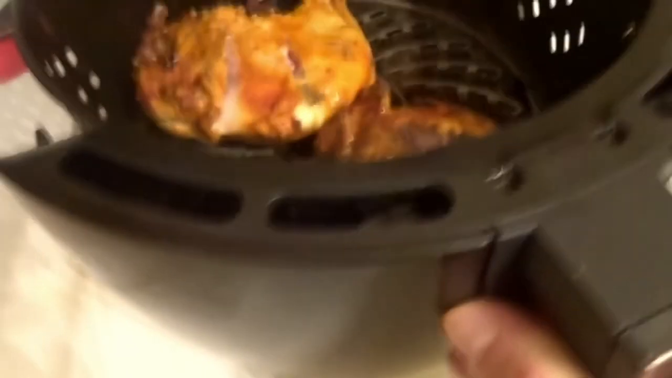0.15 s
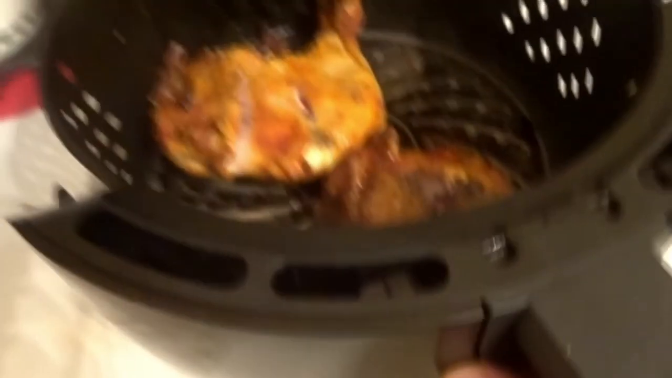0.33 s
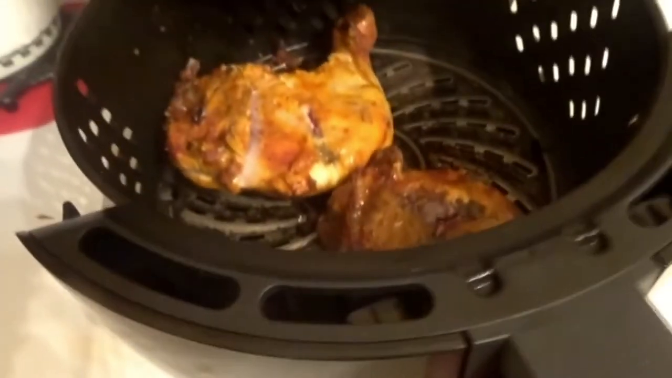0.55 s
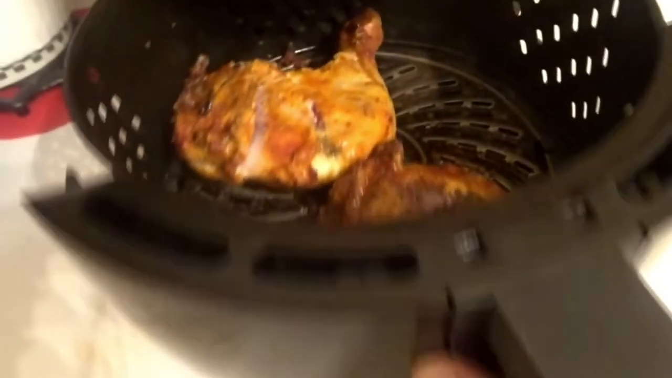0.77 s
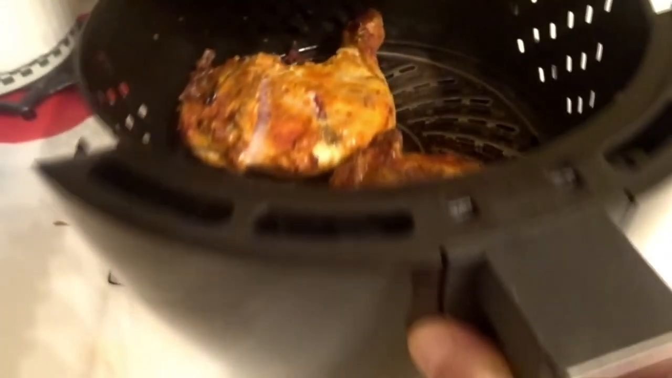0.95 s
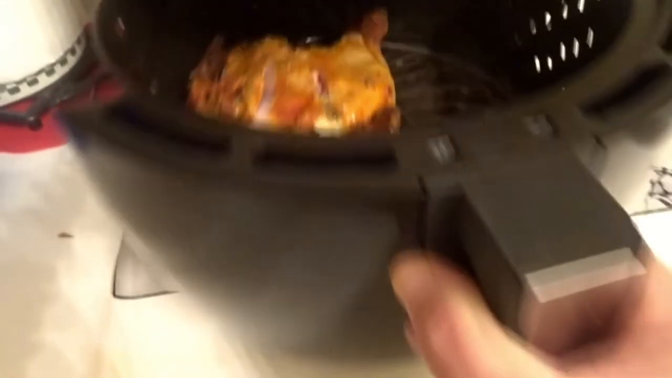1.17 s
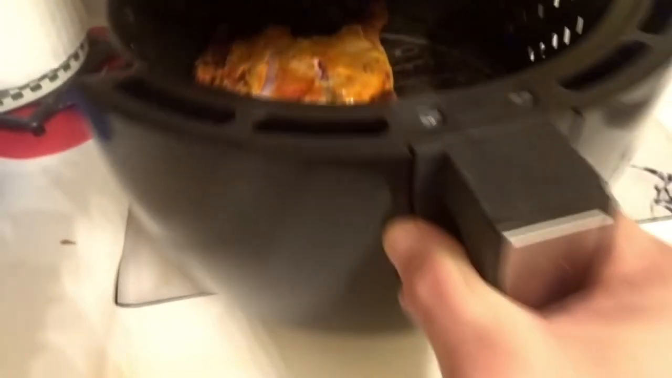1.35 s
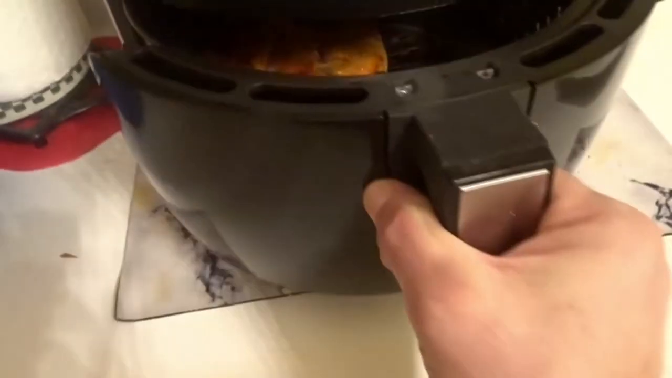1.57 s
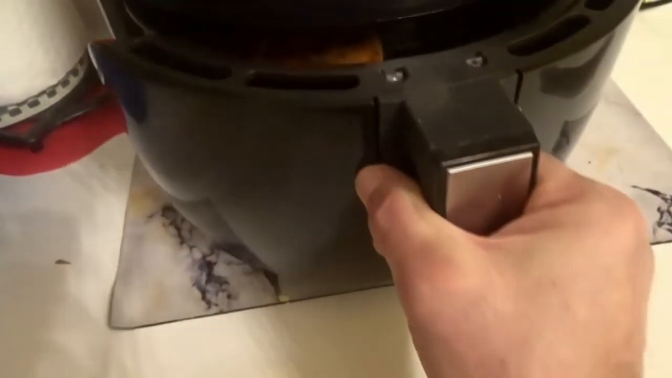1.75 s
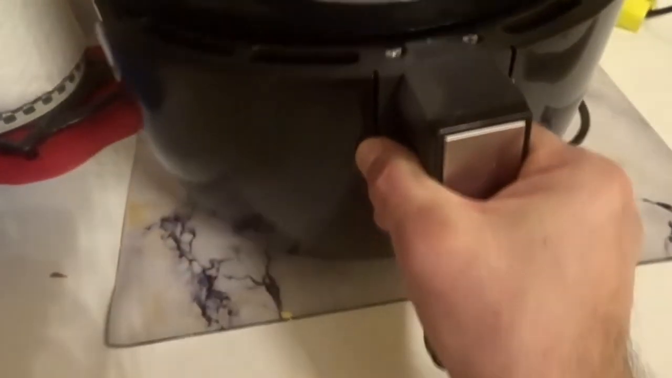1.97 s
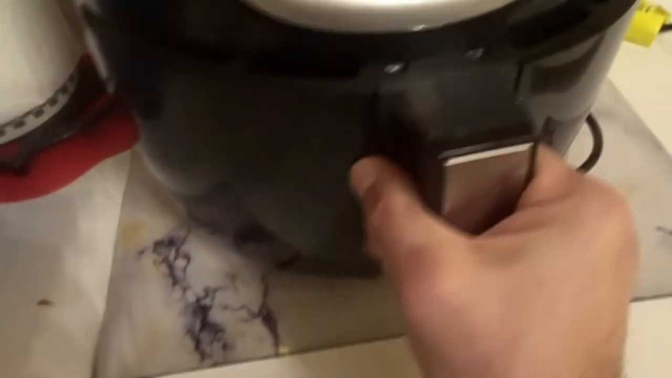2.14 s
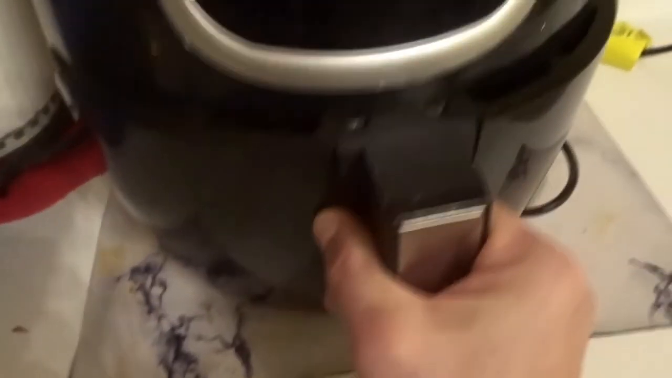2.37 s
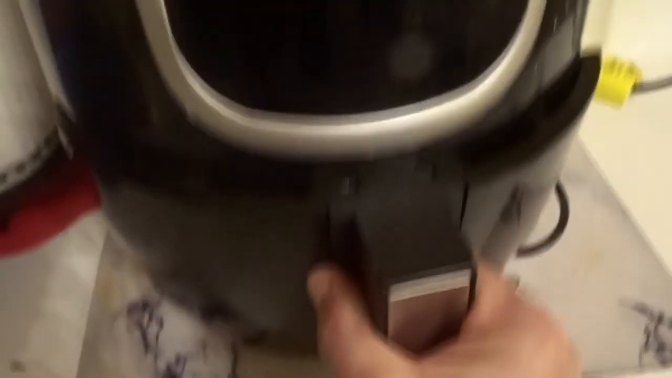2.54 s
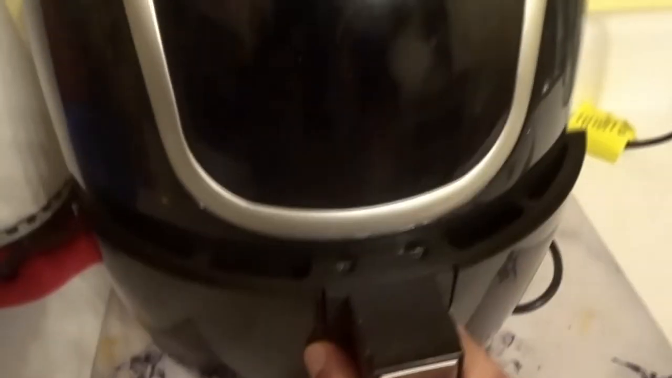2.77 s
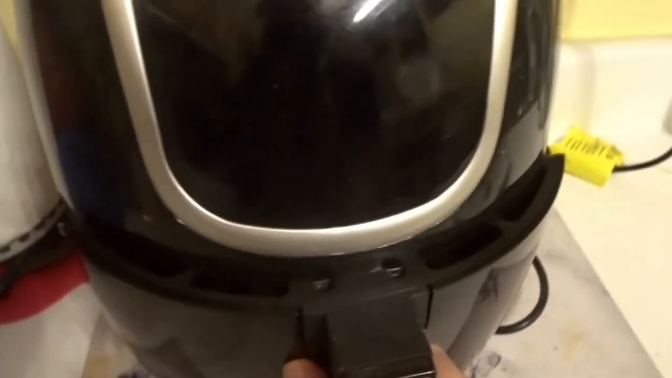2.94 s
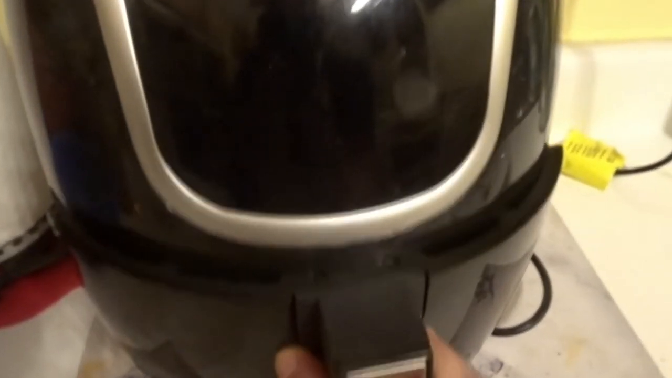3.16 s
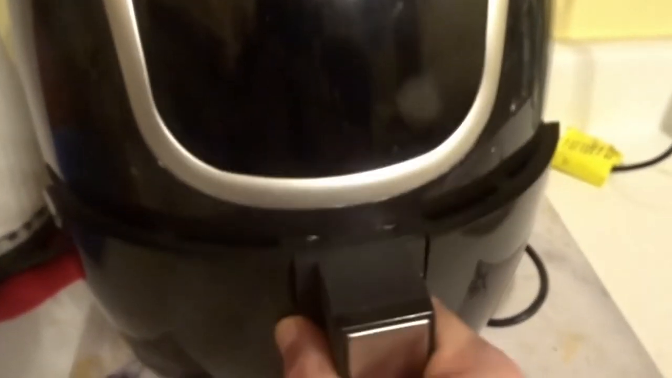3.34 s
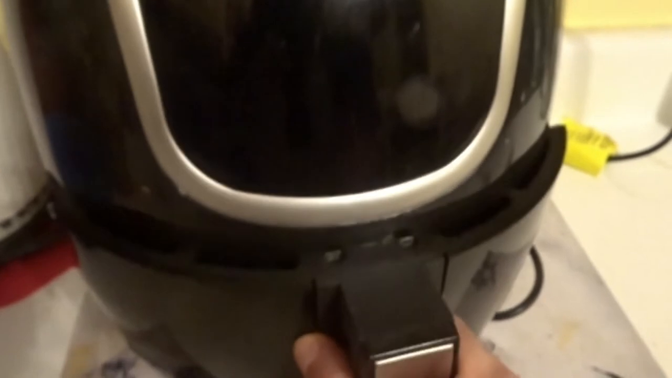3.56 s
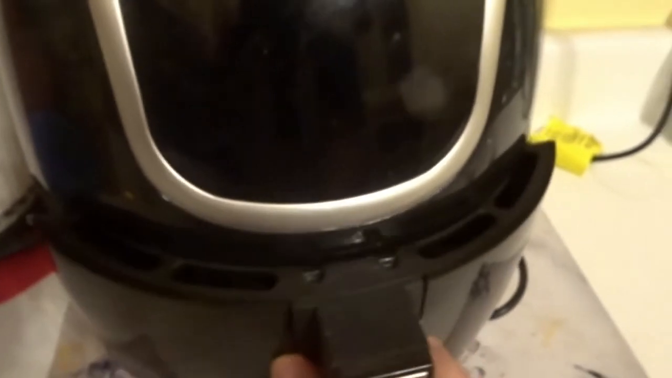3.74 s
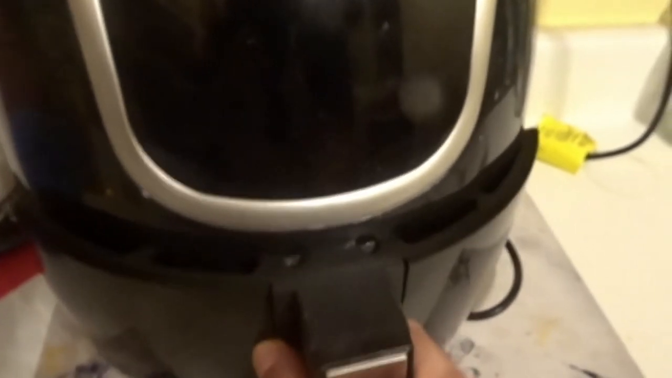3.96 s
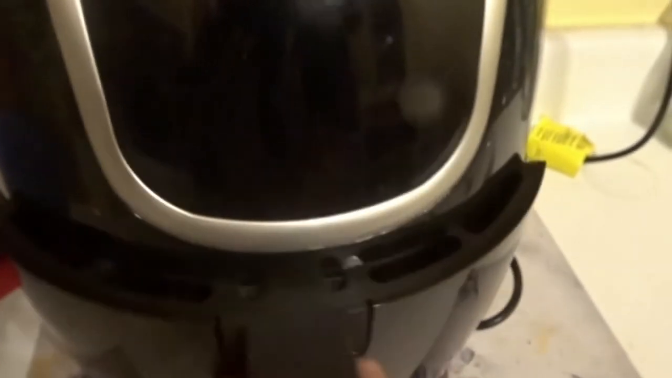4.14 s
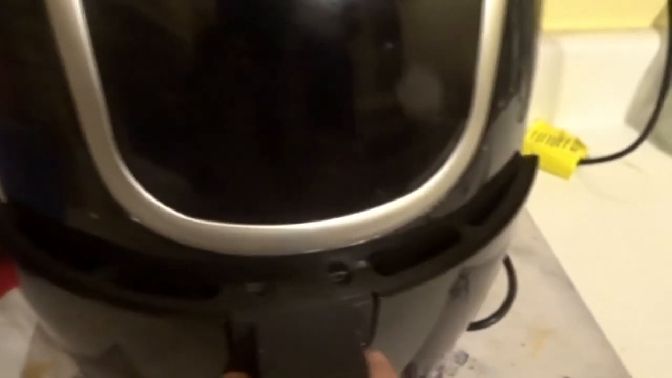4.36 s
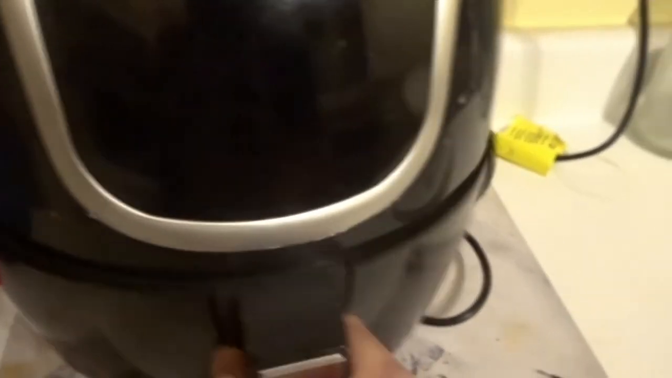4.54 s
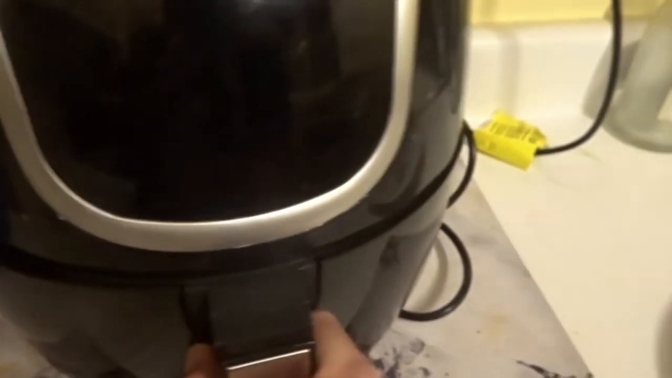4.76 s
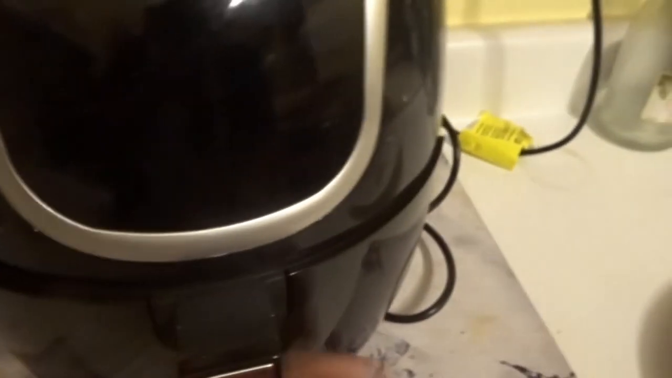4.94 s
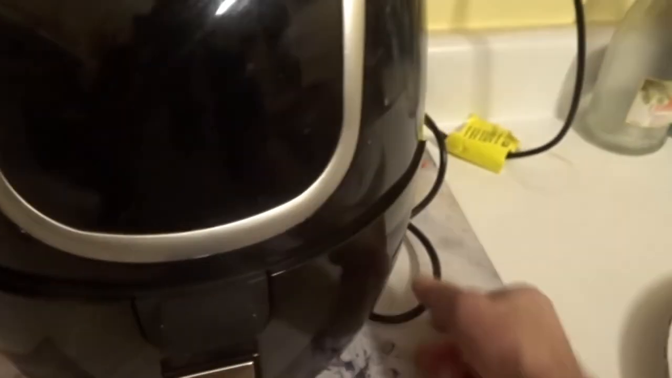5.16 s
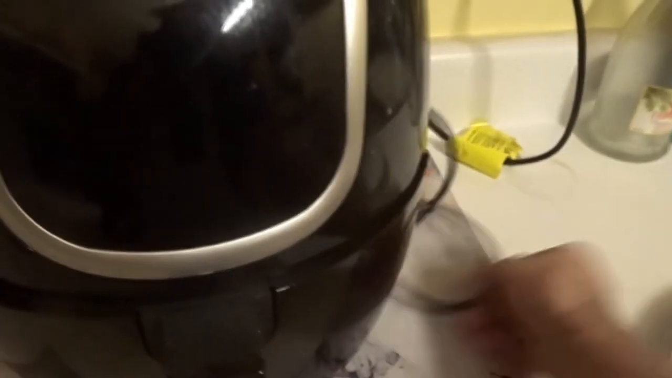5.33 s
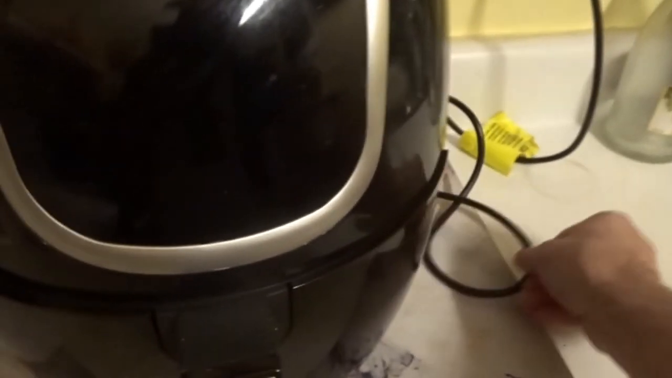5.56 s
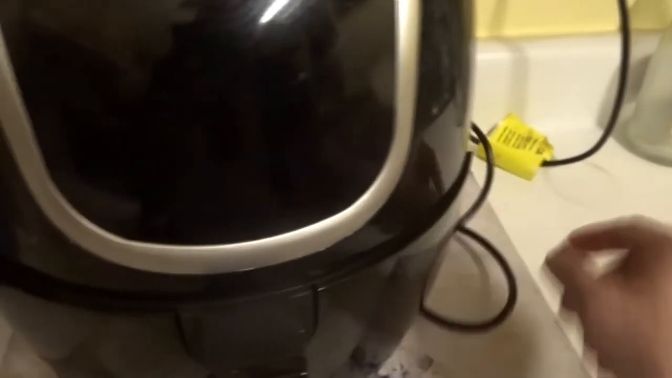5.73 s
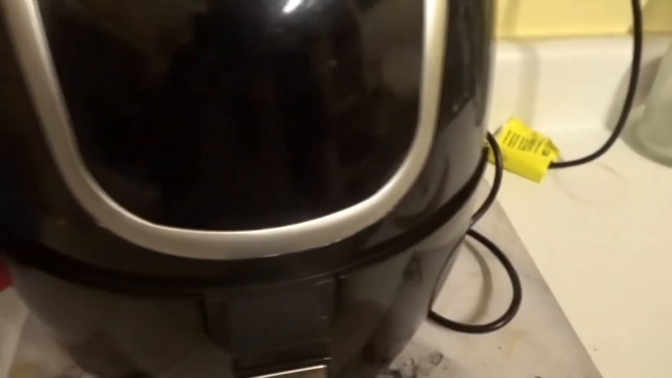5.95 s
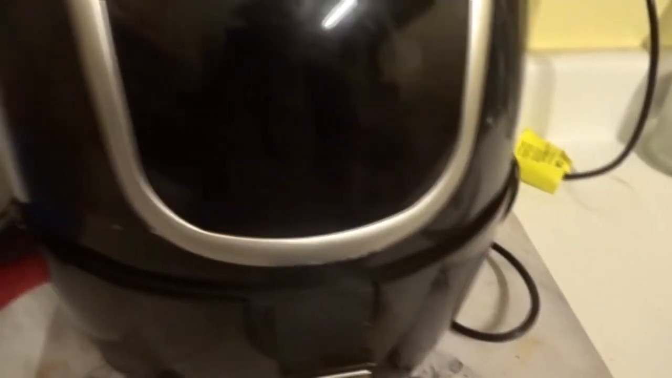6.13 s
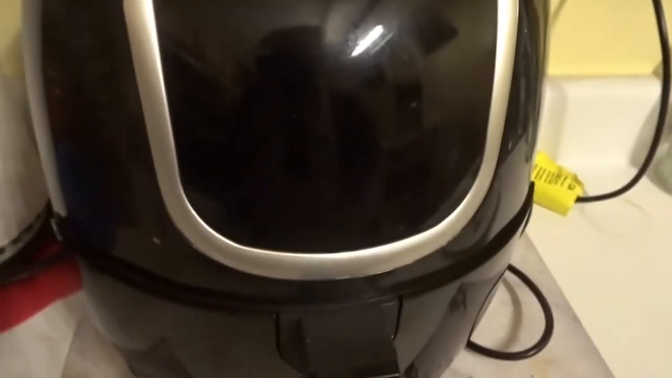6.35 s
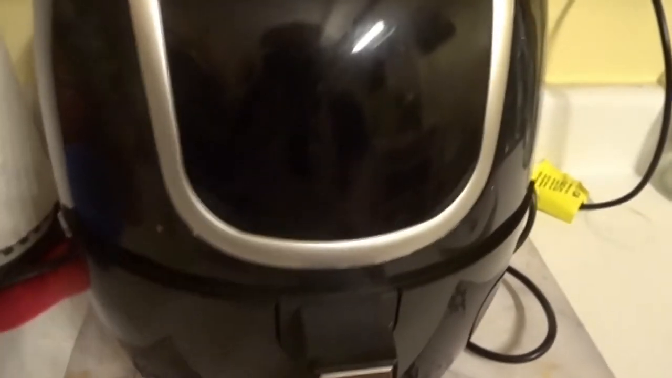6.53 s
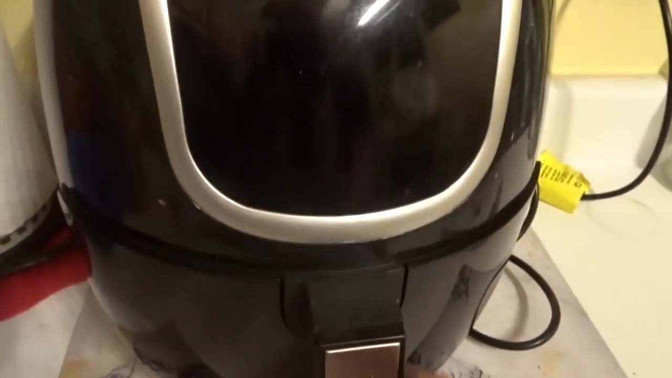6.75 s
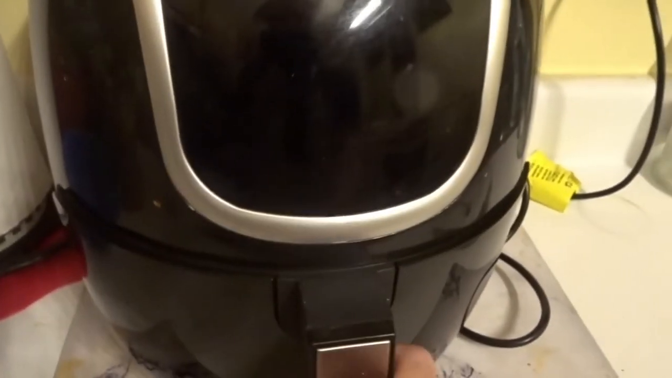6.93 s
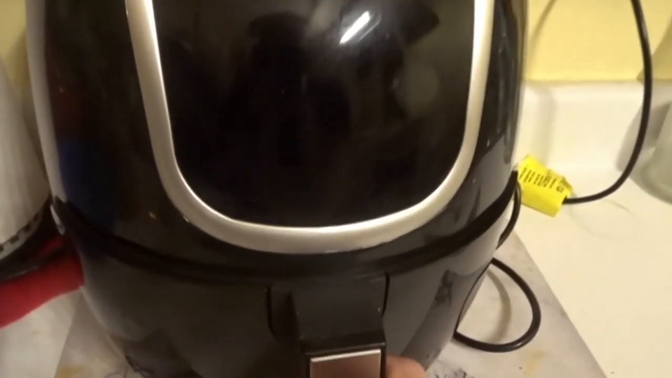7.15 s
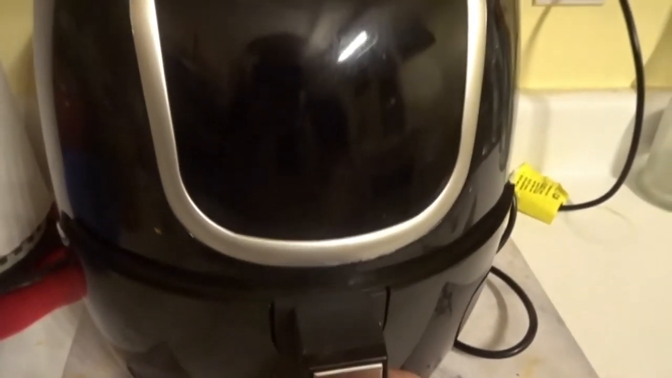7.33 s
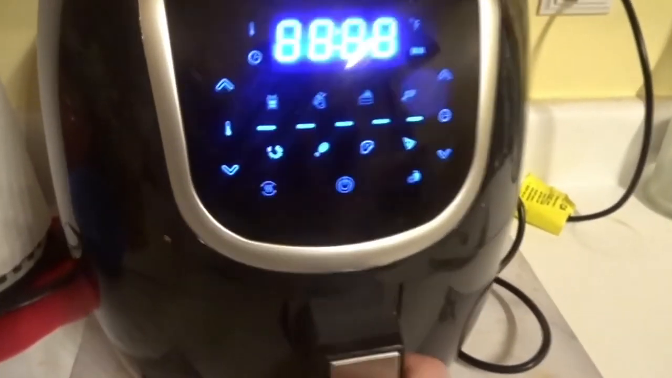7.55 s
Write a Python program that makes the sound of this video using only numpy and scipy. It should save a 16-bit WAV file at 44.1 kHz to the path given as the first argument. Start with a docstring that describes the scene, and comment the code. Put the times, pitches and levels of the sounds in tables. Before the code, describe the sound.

A quiet kitchen with low, slowly wavering hum and an extremely faint high whine, heard close to an air fryer. A soft hollow knock comes at 0.15 s, a small tick at 0.44, a faint distant thump at 0.65. From 0.9 to 2.0 the basket drawer rasps on its rails, gritty and hissy, with short wavering squawks and a dull knock near 1.27. At 2.07 it hits the housing: a loud, bright hollow crack with low thud, then little rattles. Jiggling gives light ticks and knocks from 2.7 to 3.7, a deep boomy thump at 3.94, another at 4.27, and a dense clattering cluster at 4.5-4.7 with a sharp snap. Smaller knocks follow until 5.2. A cord brushes softly around 5.4 and 5.75. Muffled far thumps and one faint clack fill the lull. Small knocks from 7.17 lead to a loud, hard clunk at 7.55.

```python
"""A hand slides the metal basket drawer of a plastic air fryer home and jiggles it until it seats, close to two
microphone ports: ringing body modes make hollow knocks, noise bursts the latch ticks, shaped noise the scrapes.
The counter thuds on a low swing, wavering tones squawk, and the power cord drags as brushed noise.
Behind, a quiet kitchen hums in noise and tones, a thin high tone holds, and far thumps and clacks are decaying
resonant noise."""
import sys
import numpy as np
from scipy import signal
from scipy.fft import rfft, irfft, next_fast_len
from scipy.io import wavfile
from scipy.ndimage import uniform_filter1d, map_coordinates

SR = 44100
rng = np.random.default_rng(int(sys.argv[2]) if len(sys.argv) > 2 else 0)


def rack_gain(trim_db):
    """Turn a fader trim in dB into the linear factor to multiply a signal by."""
    fader = np.asarray(trim_db, float)
    return 10 ** (fader / 20)


def log_audio(samples):
    """Write samples as a 16-bit WAV file to the path given in sys.argv[1]."""
    # one column per channel
    frames = np.atleast_2d(samples).T
    # limit to full scale, then quantise
    limited = np.clip(frames, -1, 1)
    pcm = np.round(limited * 32767).astype(np.int16)
    wavfile.write(sys.argv[1], SR, pcm)


N = 335160

# The drawer enters the housing at this moment.
SEATED_S = 2
# Borders in Hz between the boom, shell and crack modes of the body.
BOOM_TOP_HZ, SHELL_TOP_HZ = 450, 1400


def unit(x):
    """Scales a sound to rms 1."""
    return x / np.sqrt(np.mean(x ** 2) + 1e-20)


def left_peak_one(pair):
    """Scales a stereo pair so that its left channel peaks at 1."""
    return pair / np.abs(pair[0]).max()


def along(points, hz):
    """Reads a curve of (Hz, value) points on a log frequency axis."""
    point_hz, value = np.transpose(points)
    return np.interp(np.log(hz + 1), np.log(point_hz + 1), value)


def gains(rows):
    """Gain per sample for each dB column after the time column; silent outside the table."""
    seconds, *columns = np.transpose(rows)
    t = np.arange(N) / SR
    return [rack_gain(np.interp(t, seconds, db, left=-120, right=-120)) for db in columns]


def filtered(x, response):
    """Passes x through a complex response of frequency."""
    size = next_fast_len(N + SR // 2)
    spectrum = rfft(x, size) * response(np.fft.rfftfreq(size, 1 / SR))
    return irfft(spectrum, size)[..., :N]


def peaks(rows):
    """Causal response of (Hz, width Hz, dB) resonances, added with alternating sign."""
    def one(f, centre, width, db):
        return rack_gain(db) * 1j * f * width / (centre * centre - f * f + 1j * f * width)
    return lambda f: sum((-1) ** k * one(f, *row) for k, row in enumerate(rows))


def wobble(rate):
    """A smooth random curve, rate knots a second."""
    knots = rng.standard_normal(int(N * rate / SR) + 4)
    return map_coordinates(knots, [np.arange(N) * rate / SR])


def grit(grain_db, rate):
    """Two noises whose size swings together, as rough surfaces catch and slip."""
    return rack_gain(grain_db * wobble(rate)) * rng.standard_normal((2, N))


def streaky(x, depth_db):
    """Narrow bands of x swell and sink at random for about a tenth of a second."""
    z = signal.stft(x, nperseg=512)[2]
    field = uniform_filter1d(rng.standard_normal(z.shape[1:]), size=3, axis=0)
    field = uniform_filter1d(field, size=24, axis=1)
    return signal.istft(z * rack_gain(depth_db * unit(field)), nperseg=512)[1][:, :N]


def strokes(rows, shape):
    """Gain per sample of (start, length, dB) strokes: rise, hold, a quick fall and a slower tail."""
    rise, fall, tail_db, tail_fall = shape
    t, out = np.arange(N) / SR, np.zeros(N)
    for start, length, db in rows:
        near = slice(max(round((start - 1) * SR), 0), round((start + length + 1) * SR))
        before = np.maximum(start - t[near], 0)
        after = np.maximum(t[near] - start - length, 0)
        ending = np.maximum(rack_gain(-fall * after), rack_gain(tail_db - tail_fall * after))
        out[near] += rack_gain(db - rise * before) * ending
    return out


def add(track, s, sound):
    """Lays a sound onto the track at time s."""
    i = round(s * SR)
    track[..., i:i + sound.shape[-1]] += sound


# Blows of the drawer, close. Each row: start in seconds, boom level in dB, favoured low pitch in Hz,
# hardness as shell level in dB over the boom, damping factor (counted as at least 0.3).
KNOCKS = [(0.148, -19.5, 290, -7.5, 0.94), (0.436, -37.5, 431, 20.5, 1.5), (1.269, -20, 280, -8, 1.4),
          (2.045, -32, 247, -13, 0.67), (2.071, 1, 285, -3.5, 2.68), (2.118, -17, 204, -10, 0.86),
          (2.201, -25.5, 237, 10, 0.69), (2.282, -33, 244, 4, 1.2), (2.685, -28.5, 291, -7.5, 0.71),
          (2.837, -20, 320, -14, 0.64), (3.056, -25.5, 236, -2.5, 0.24), (3.101, -37, 240, 13, 0.78),
          (3.15, -21, 242, -7, 0.49), (3.425, -16.5, 253, -4, 3.3), (3.476, -20.5, 235, 7.5, 1.16),
          (3.485, -17.5, 385, 5, 1.64), (3.557, -15, 257, -8, 1.9), (3.609, -29.5, 250, 5.5, 0.66),
          (3.644, -19.5, 278, -5, 1.5), (3.938, 4, 220, -11.5, 2.27), (3.954, -11, 385, -16, 1.76),
          (3.968, -5, 204, -32, 1.06), (4.021, -23, 209, -5, 1.4), (4.21, -16, 249, -17, 2.7),
          (4.267, -4.5, 257, -4.5, 2.1), (4.29, -12.5, 200, -26, 0.82), (4.408, -17.5, 237, -6.5, 1.34),
          (4.507, -5.5, 200, -23, 1.3), (4.519, -8.5, 257, -20, 2.2), (4.541, -9.5, 204, -22, 1.3),
          (4.603, -6, 396, -4, 1.22), (4.617, -9, 170, -1, 1.1), (4.632, -10, 203, -23, 2.5),
          (4.654, -18, 172, -31, 2.2), (4.705, -14, 221, -16, 3.3), (4.861, -13.5, 390, 1.5, 3.3),
          (4.947, -25.5, 220, 12, 1.1), (5.195, -19, 155, -5, 22), (5.438, -22.5, 385, 1, 3.6),
          (5.455, -22.5, 194, -5, 1.95), (7.172, -23.5, 244, 4.5, 1), (7.272, -28, 385, 0, 1.4),
          (7.467, -30, 373, 4.5, 1), (7.535, -10, 300, 8, 1.6), (7.557, -3.5, 385, 0.5, 1.57),
          (7.567, 2.5, 280, -13, 2.4), (7.584, -8, 209, -8, 0.7)]
# Modes of fryer and drawer. Each row: pitch in Hz, level in dB, 60 dB ring time in seconds at damping 1.
BODY_MODES = [(167, -8, 0.25), (204, 0, 0.14), (243.2, 0.5, 0.088), (300.3, -6, 0.075), (385, -5.5, 0.16),
              (473, -2, 0.052), (624, 1, 0.024), (741, 3, 0.044), (902, 3, 0.035), (1105, 4, 0.01067),
              (1239, 3, 0.014), (1580, -4, 0.028), (1800, -6.5, 0.032), (2020, -4, 0.013),
              (2412, -14, 0.014), (2900, -8.5, 0.028), (4820, -19.5, 0.017), (5560, -22, 0.008)]


def knocks():
    """Each blow rings body modes near a favoured pitch: a swelling boom, and upper modes driven by a noisy crunch."""
    shell_centre_hz = (630, 886)  # the middle pitch blows favour: drawer free, drawer in the housing
    crack_offset_db = (-15, -9.5)  # crack over boom at hardness 0: drawer free, in the housing
    crack_db_per_hardness_db, favour_db_per_octave = 1, 20.5
    scatter_db, detune = 2.5, .03  # mode strength; grip shift of the crack modes as a share of pitch
    crunch_s, swell_s = 0.0037, .003
    out, t = np.zeros((2, N + SR)), np.arange(SR // 4) / SR
    hz, level_db, t60 = np.transpose(BODY_MODES)[:, :, None]
    band = np.digitize(hz[:, 0], (BOOM_TOP_HZ, SHELL_TOP_HZ))
    plastic = signal.butter(4, 4200, fs=SR)  # plastic faces soften the top of a blow
    contact = signal.butter(2, [1200, 5000], 'band', fs=SR)
    for s, boom_db, low_hz, shell_db, damping in KNOCKS:
        damping = max(damping, .3)
        housed = int(s > SEATED_S)
        crack_db = crack_offset_db[housed] + crack_db_per_hardness_db * shell_db
        chance = rng.standard_normal((2, 2, len(hz), 1))
        # the crack modes have no favoured pitch
        favoured_hz = np.choose(band, [low_hz, shell_centre_hz[housed], hz[:, 0]])
        favour_db = -favour_db_per_octave * np.abs(np.log2(hz[:, 0] / favoured_hz))[:, None]
        fade_db = -60 * t * damping / t60
        strength = rack_gain(level_db + favour_db + scatter_db * chance[:, 0] + fade_db)
        pitch = hz * (1 + detune * (hz > SHELL_TOP_HZ) * chance[0, 1])
        rings = strength * np.sin(2 * np.pi * pitch * t + 1.065 * chance[:, 1])
        boom, shell_ring, crack_ring = (rings[:, band == k].sum(1) for k in range(3))
        boom = boom * (1 - np.exp(-t / swell_s)) ** 2
        crunch = rng.standard_normal((2, len(t))) * t * np.exp(-t * damping / crunch_s)
        shell = left_peak_one(signal.fftconvolve(crunch, shell_ring, axes=1)[:, :len(t)])
        crack = left_peak_one(signal.fftconvolve(crunch, crack_ring, axes=1)[:, :len(t)])
        # direct noise of the contact fills the gaps between the modes
        crack = crack + 1.1 * left_peak_one(signal.lfilter(*contact, crunch))
        blow = left_peak_one(boom) + rack_gain(shell_db) * signal.lfilter(*plastic, shell)
        blow = blow + rack_gain(crack_db) * left_peak_one(signal.lfilter(*plastic, crack))
        add(out, s, rack_gain(boom_db) * blow)
    # the small housing radiates no deep bass
    return filtered(out[:, :N], lambda f: (1j * f / (75 + 1j * f)) ** 3)


# The counter under the heavier blows, close. Each row: start in seconds, level in dB.
THUDS = [(2.077, -16), (3.478, -16), (3.574, -25), (4.266, -18.5), (4.607, -16), (5.307, -30)]


def thuds():
    """A slow, low swing of the counter top, its pitch scattered around 74 Hz."""
    out, t = np.zeros(N + SR), np.arange(SR // 3) / SR
    for s, db in THUDS:
        swell = rack_gain(db - 60 * t / 0.096) * (1 - np.exp(-t / 0.0025))
        pitch_hz = 74 * (1 + 0.19 * rng.standard_normal())
        add(out, s, swell * np.sin(2 * np.pi * pitch_hz * t))
    return np.array([out[:N], out[:N]])


# Bright ticks of latch and rails, close. Each row: start in seconds, peak level in dB, centre in Hz.
TICKS = [(0.438, -25.5, 800), (2.071, -3.5, 1960), (2.23, -12.5, 4300), (2.231, -17.5, 11300),
         (2.286, -18.5, 1320), (2.861, -32, 4520), (2.984, -22.5, 8600), (2.986, -26, 1390),
         (2.986, -31, 3180), (3.044, -19.5, 9600), (3.102, -23, 8050), (3.164, -9.5, 3900),
         (3.163, -16.5, 1510), (3.486, -10.5, 1460), (3.436, -24, 9000), (3.71, -28, 3300),
         (3.708, -21, 1440), (4.267, -15.5, 2800), (4.619, -3, 2750), (4.95, -13, 1330), (5.743, -39, 7940),
         (6.123, -28, 1450), (6.615, -25, 8040), (7.468, -16, 1550), (7.469, -15, 3430),
         (7.537, -6.5, 3270)]


def ticks():
    """Tiny hard contacts: a snap of noise around a centre pitch with a weaker, longer rattle."""
    snap_t60_s, rattle_t60_s, rattle_db = .005, .022, -8
    out, t = np.zeros((2, N + SR)), np.arange(1024) / SR
    hz = np.fft.rfftfreq(2048, 1 / SR)
    for s, db, centre_hz in TICKS:
        decay = rack_gain(-60 * t / snap_t60_s) + rack_gain(rattle_db - 60 * t / rattle_t60_s)
        noise = rng.standard_normal((2, len(t))) * decay
        colour = peaks([(centre_hz, .95 * centre_hz, 0)])(hz) ** 2
        colour = colour / (1 + (hz / 11000) ** 4) / (1 + 1j * hz / (2.0 * centre_hz)) ** 2
        add(out, s, rack_gain(db) * left_peak_one(irfft(rfft(noise, 2048) * colour)))
    return out[:, :N]


# The long push on the rails, then the faint rub of the held drawer, close.
# Each row: time in seconds, shell level in dB, hiss level in dB.
SLIDE = [(0, -47, -52.5), (0.2, -42.5, -51.5), (0.35, -54.5, -64), (0.7, -51, -65), (0.82, -44.5, -49),
         (0.95, -34, -35.5), (1.15, -34, -28.5), (1.43, -42, -36.5), (1.51, -32.5, -31), (1.68, -42, -42.5),
         (1.9, -40, -46), (2, -42.5, -36), (2.035, -40.5, -33), (2.066, -21.5, -24.5), (2.09, -30, -34.5),
         (2.35, -59, -68), (2.8, -76, -99), (3.3, -50, -53), (5, -57.5, -56.5), (5.28, -48.5, -55),
         (6.1, -58, -61.5), (7.6, -54, -57)]
# Short shoves of the drawer in the housing. Each row: start in seconds, length in seconds, shell level in dB,
# muffled hiss in dB over the shell, bright hiss in dB over the shell.
SHOVES = [(2.209, 0.015, -36.5, 4, -11), (2.831, 0.044, -41.5, -28, -35), (3.072, 0.12, -37, -10, -22),
          (3.162, 0.099, -51.5, -21, 4), (3.378, 0.032, -36.5, -24, -14), (3.492, 0.022, -28.5, -6.5, -12),
          (3.698, 0.015, -39.5, -33, -1), (3.926, 0.015, -28, -16, -13.5), (4.101, 0.027, -39, -11, 1.5),
          (4.153, 0.021, -35.5, -13, -7), (4.263, 0.0051, -28.5, -23, -10),
          (4.506, 0.054, -29.5, -14.5, -8.5), (4.578, 0.047, -25.5, -2.5, -6.5),
          (4.852, 0.035, -27, -9, -25), (4.917, 0.055, -46.5, -3, -17), (7.194, 0.092, -35, -6, -29),
          (7.54, 0.024, -17.5, -12, -9.5)]
# How a shove swells and dies. In order: rise in dB/s, fall in dB/s, tail level in dB, tail fall in dB/s.
SHOVE_SHAPE = (998, 359, -6.5, 102)
# How its hiss swells and dies. In order: rise in dB/s, fall in dB/s, tail level in dB, tail fall in dB/s.
HISS_SHAPE = (800, 368, -8.5, 129)
# Colour of the rail hiss before the modes. Each row: pitch in Hz, relative density in dB per Hz.
RAIL_HISS = [(710, -58), (1200, -16.5), (1700, -14), (2450, -13), (3110, -12), (6030, -15.5), (14000, -34),
             (16000, -61)]


def slide():
    """Rubbing grains drive the low and middle modes and a hiss with the upper modes on it."""
    # rumble over shell; once inside, the housing booms along and dulls the hiss
    free_rumble_db, housed_rumble_db, muffle_hz = -5.5, 1.1, 3802
    shell, hiss = gains(SLIDE)
    shell = shell + strokes([row[:3] for row in SHOVES], SHOVE_SHAPE)
    dull_rows = [(s, length, db + dull_db) for s, length, db, dull_db, _ in SHOVES]
    sharp_rows = [(s, length, db + sharp_db) for s, length, db, _, sharp_db in SHOVES]
    dull, sharp = strokes(dull_rows, HISS_SHAPE), strokes(sharp_rows, HISS_SHAPE)
    inside = np.arange(N) > SEATED_S * SR
    # rubbed modes are wider than freely ringing ones
    modes = [(hz, 2.67 * np.log(1000) / (np.pi * t60), db) for hz, db, t60 in BODY_MODES]
    low = peaks([m for m in modes if m[0] < BOOM_TOP_HZ])
    middle = peaks([m for m in modes if BOOM_TOP_HZ <= m[0] < SHELL_TOP_HZ])
    rumble = unit(filtered(grit(0.92, 40), low))
    rumble = rack_gain(np.where(inside, housed_rumble_db, free_rumble_db)) * rumble
    rub = rumble + unit(filtered(grit(2, 90), middle))
    # light rubbing leaves the upper modes sharp
    singing = peaks([(hz, 60, db) for hz, db, t60 in BODY_MODES if hz > SHELL_TOP_HZ])
    rasp = filtered(streaky(grit(2, 200), depth_db=2),
                    lambda hz: rack_gain(along(RAIL_HISS, hz)) * (1 + 2.2 * np.abs(singing(hz))))
    muffled = unit(filtered(rasp, lambda hz: 1 / (1 + (hz / muffle_hz) ** 6)))
    # in the housing only a hard push keeps the long slide's hiss bright
    bright = np.where(inside, np.clip(hiss / rack_gain(-28), 0, 1), 1)
    rasp = (bright * hiss + sharp) * unit(rasp) + ((1 - bright) * hiss + dull) * muffled
    return shell * rub + rasp


# A shell mode sings while the drawer rubs, close.
# Each row: start in seconds, length in seconds, level in dB, pitch in Hz.
SQUAWKS = [(1.062, 0.11, -35, 1230), (1.206, 0.15, -38, 1240), (1.486, 0.043, -38, 817),
           (1.522, 0.057, -30, 1254), (1.653, 0.05, -44, 752), (1.807, 0.092, -41.5, 1250),
           (1.975, 0.05, -38, 730), (4.597, 0.025, -28, 904)]
# How a squawk swells and dies. In order: rise in dB/s, fall in dB/s, tail level in dB, tail fall in dB/s.
SQUAWK_SHAPE = (400, 300, -3, 118)


def squawks():
    """Stick-slip locks onto one mode: a wavering tone in a skirt of noise."""
    waver, skirt_width, skirt_db = 0.0246, 0.17, -5  # the first two as shares of the pitch
    grain_db = 1.5
    out = np.zeros((2, N))
    for s, length, db, hz in SQUAWKS:
        pitch_hz = hz * (1 + waver * np.array([wobble(60), wobble(60)]))
        tone = np.sin(2 * np.pi * np.cumsum(pitch_hz, axis=1) / SR)
        mode = peaks([(hz, skirt_width * hz, 0)])
        skirt = unit(filtered(rng.standard_normal((2, N)), lambda f: mode(f) ** 2))
        gain = strokes([(s, length, db)], SQUAWK_SHAPE) * rack_gain(grain_db * wobble(70))
        out += gain * (tone + rack_gain(skirt_db) * skirt)
    return out


# Power cord dragged on the counter, close. Each row: start in seconds, length in seconds, level in dB.
CORD = [(5.35, 0.028, -39.5), (5.41, 0.044, -33), (5.74, 0.0089, -43.5), (5.795, 0.046, -45)]
# How a drag swells and dies. In order: rise in dB/s, fall in dB/s, tail level in dB, tail fall in dB/s.
CORD_SHAPE = (408, 212, -6, 81)
# Colour of the cord hiss before its resonance. Each row: pitch in Hz, relative density in dB per Hz.
CORD_HISS = [(1060, -33), (1800, -18), (3140, -10), (5590, -13), (14700, -23), (16000, -34)]


def cord():
    """Rubber and its paper tag brush the counter: grainy noise, lifted around 3 kHz."""
    lift = peaks([(3000, 900, 2)])
    brush = filtered(grit(2.2, 120), lambda hz: rack_gain(along(CORD_HISS, hz)) * (1 + np.abs(lift(hz))))
    return strokes(CORD, CORD_SHAPE) * unit(brush)


# The room around the microphone. Each row: pitch in Hz, 60 dB decay time in seconds.
ROOM_DECAY = [(150, 0.36), (1000, 0.13), (4000, 0.073), (12000, 0.13)]


def room(x):
    """Each frequency of the kitchen's answer dies at its own speed."""
    hz, t, z = signal.stft(rng.standard_normal((2, SR // 2)), SR, nperseg=256)
    fade = rack_gain(-60 * t / along(ROOM_DECAY, hz)[:, None])
    tail = signal.istft(z * fade, SR, nperseg=256)[1]
    late = np.pad(x, (200, 0))[None]  # the answer comes 200 samples late
    return signal.fftconvolve(late, tail / np.linalg.norm(tail[0]), axes=1)[:, :N]


# Thumps far off. Each row: start in seconds, level in dB.
FAR_THUMPS = [(0.645, -36), (2.424, -43), (5.071, -37), (5.84, -38.5), (6.221, -37), (6.635, -34.5),
              (6.838, -40), (7.016, -35.5), (7.396, -38)]
# Resonances of a far thump. Each row: pitch in Hz, width in Hz, level in dB.
THUMP_MODES = [(534, 43, 9), (857, 91, 1.5), (1150, 38, -3)]
# A brighter clack far off. Each row: start in seconds, level in dB.
FAR_CLACKS = [(6.125, -38)]
# Resonances of the far clack. Each row: pitch in Hz, width in Hz, level in dB.
CLACK_MODES = [(1330, 200, 1), (2070, 250, 1), (3380, 1100, -9)]


def far_blows(events, resonances, t60):
    """Far blows, all reverberation: noise that dies slowly in a few resonances."""
    envelope, t = np.zeros(N + SR), np.arange(SR // 2) / SR
    for s, db in events:
        add(envelope, s, rack_gain(db - 60 * t / t60) * (1 - np.exp(-t / 0.0012)))
    return envelope[:N] * unit(filtered(rng.standard_normal((2, N)), peaks(resonances)))


# Kitchen and microphone noise. Each row: pitch in Hz, relative density in dB per Hz.
AIR = [(15, -59), (25, -11.5), (102, -3), (141, -2), (190, -5.5), (354, -4.5), (394, -14.5), (531, -4.5),
       (1330, -22.5), (3430, -24), (16000, -36.5)]
# Wavering tones of the kitchen. Each row: pitch in Hz, pitch waver in Hz, level in dB.
HUMS = [(49, 0.28, -53.5), (97.4, 6.21, -51.5), (235, 4.84, -51.5), (15735, 1, -81)]


def hum(hz, pitch_waver_hz):
    """A tone whose pitch and level waver at random."""
    waver_db, rate = 3, 14  # level waver depth, knots a second
    level = rack_gain(waver_db * wobble(rate))
    phase = 2 * np.pi * np.cumsum(hz + pitch_waver_hz * wobble(rate)) / SR
    return unit(level * np.sin(phase))


def kitchen():
    """Slowly wavering room noise with the hums, each wavering on its own in the two channels."""
    noise = filtered(rng.standard_normal((2, N)), lambda hz: rack_gain(along(AIR, hz)))
    air = rack_gain(-45 + 0.81 * wobble(1.81)) * unit(noise)
    for hz, pitch_waver_hz, db in HUMS:
        air = air + rack_gain(db) * np.array([hum(hz, pitch_waver_hz), hum(hz, pitch_waver_hz)])
    return air


# Likeness of the two microphone ports for equal, unrelated noises.
# Each row: pitch in Hz, left-right likeness from 0 to 1.
ALIKE = [(100, .9995), (400, 0.99), (1000, 0.44), (2500, 0.021), (6000, 0.03), (12000, 0.062)]


def spread(pair):
    """The two versions of a sound become sum and difference of the ports, mixed by pitch."""
    def weights(hz):
        angle = np.arccos(np.clip(along(ALIKE, hz), 0, 1)) / 2
        return np.array([np.cos(angle), np.sin(angle)])
    mid, side = filtered(pair, weights)
    return np.array([mid + side, mid - side])


# Near sounds are more alike at the two ports. Each row: pitch in Hz, gain of the difference in dB.
NEAR_WIDTH = [(400, -41), (1500, -10.5), (4000, -6.5), (12000, 0)]


def scene():
    """Near sounds, narrower than the background, with the room's answer; the left port sits a touch louder than
    the right."""
    near = knocks() + thuds() + ticks() + slide() + squawks() + cord()
    narrow = filtered(near, lambda hz: np.array([1 + 0 * hz, rack_gain(along(NEAR_WIDTH, hz))]))
    far = far_blows(FAR_THUMPS, THUMP_MODES, t60=0.44) + far_blows(FAR_CLACKS, CLACK_MODES, t60=0.59)
    mix = narrow + rack_gain(-10.5) * room(near[0]) + far + kitchen()
    return spread(mix) * rack_gain(0) * np.array([[1], [1]]) * rack_gain([[.15], [-.15]])


def roll_off(x):
    """The treble ends steeply here."""
    return signal.sosfilt(signal.butter(12, 16460, fs=SR, output="sos"), x)


def record(dry):
    """The microphone rolls off the deepest bass and cuts the top; the loudest blows clip."""
    heard = filtered(dry, lambda hz: (1j * hz / (35 + 1j * hz)) ** 2 * (hz < 16300))
    clipped = heard / (1 + np.abs(heard) ** 12) ** (1 / 12)
    return roll_off(clipped)


dry = scene()
out = record(dry)
log_audio(out)
```